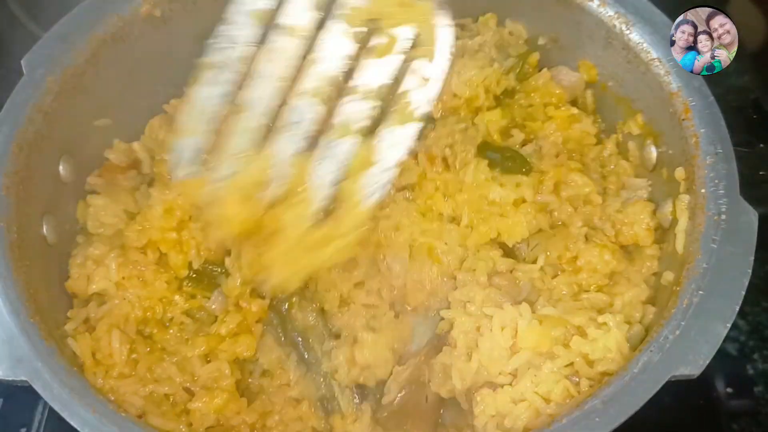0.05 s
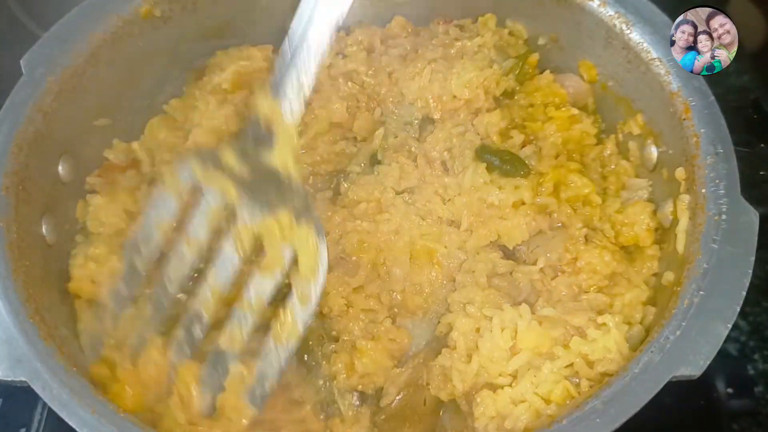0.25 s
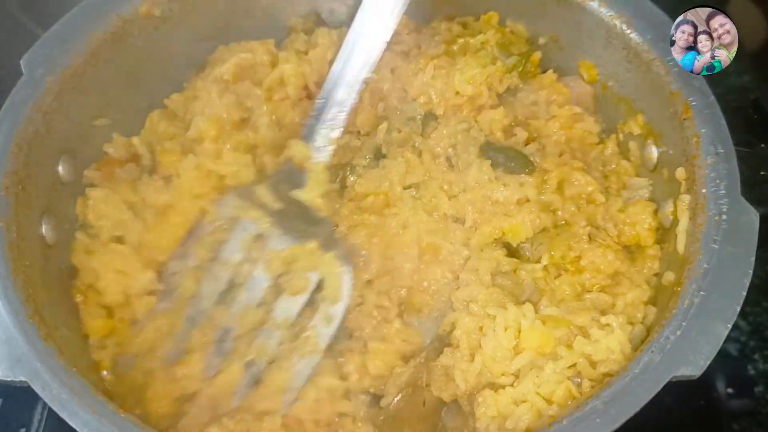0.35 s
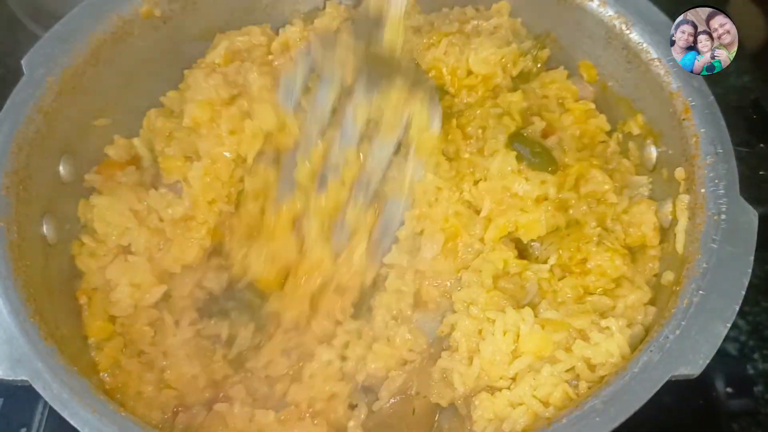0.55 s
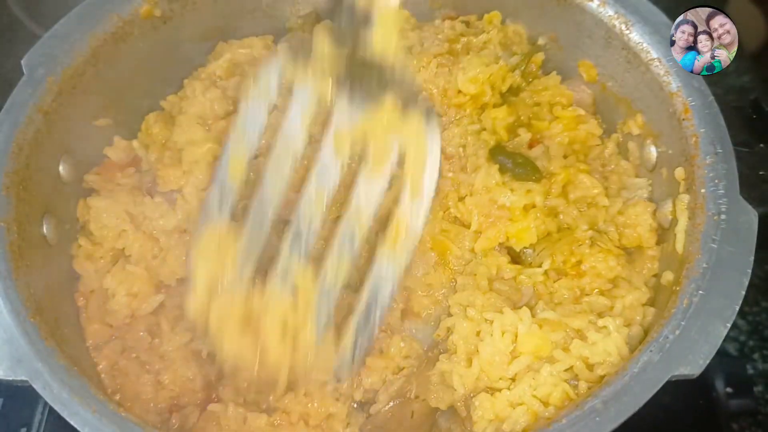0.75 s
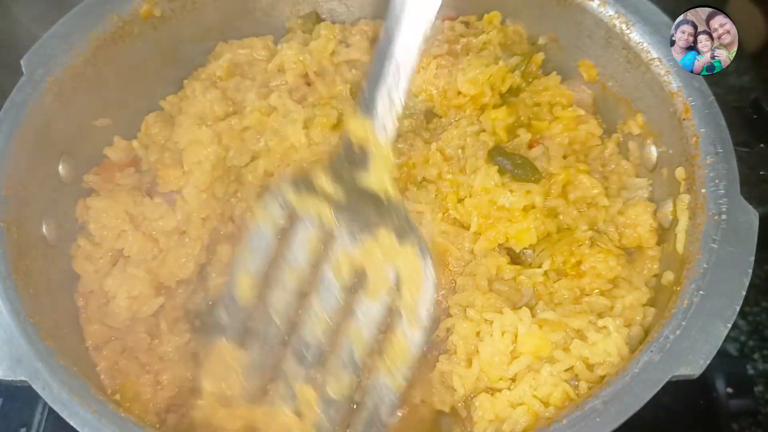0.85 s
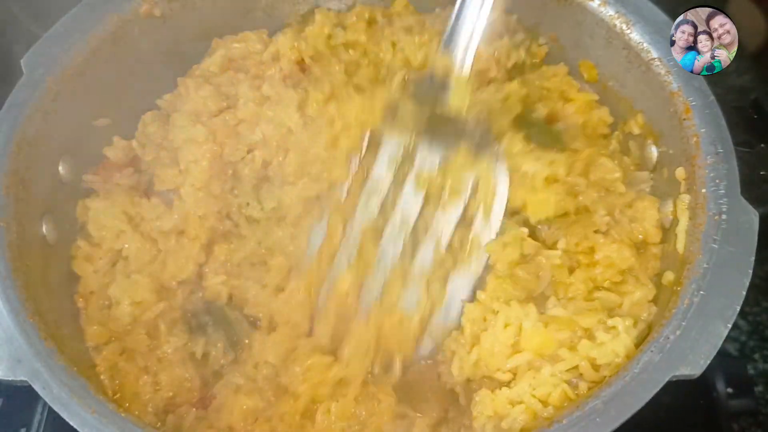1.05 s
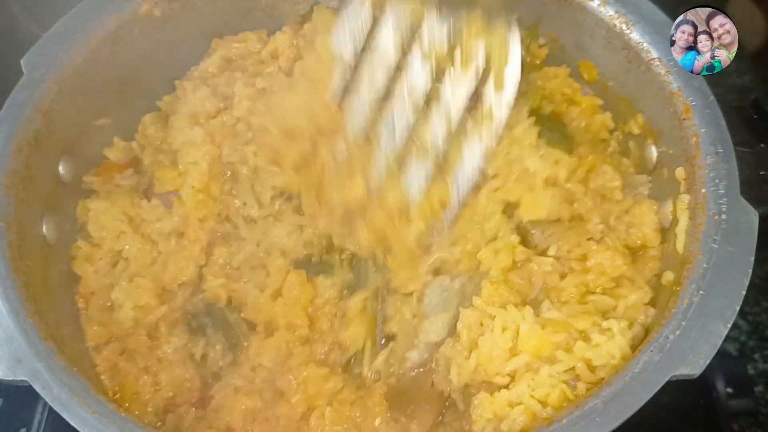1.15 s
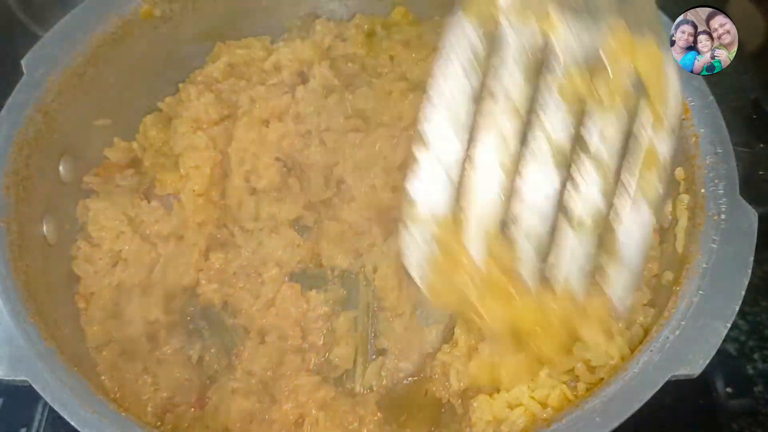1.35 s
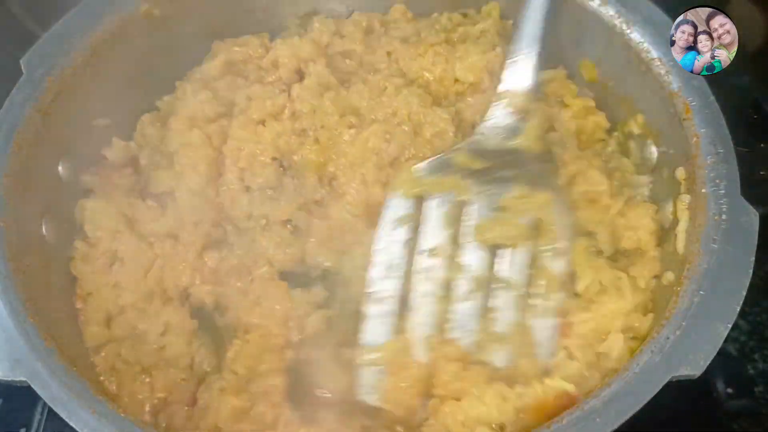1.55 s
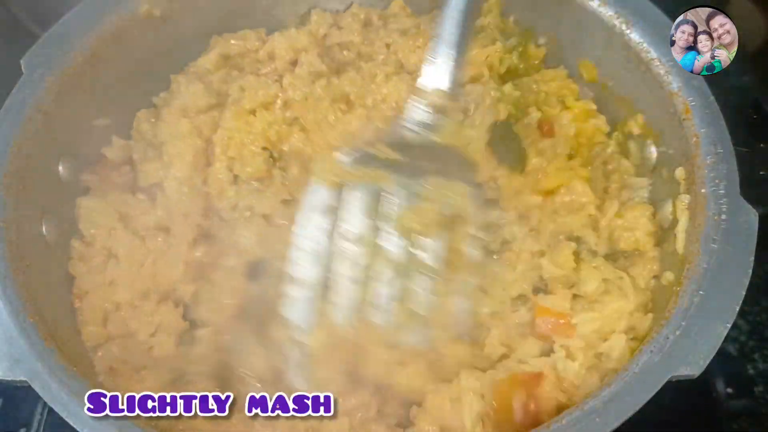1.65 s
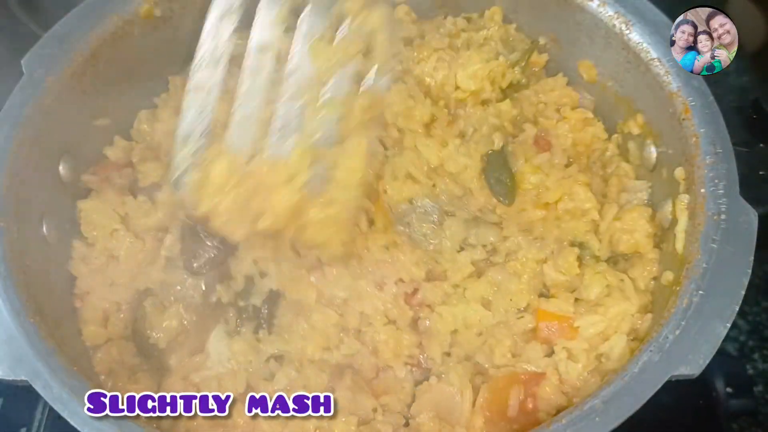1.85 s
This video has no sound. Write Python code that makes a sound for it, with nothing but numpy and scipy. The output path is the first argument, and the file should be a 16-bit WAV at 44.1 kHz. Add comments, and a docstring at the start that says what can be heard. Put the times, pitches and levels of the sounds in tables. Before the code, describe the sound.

A metal spatula works soft cooked rice in an aluminium pot. After near quiet, a hard bright clack at 0.18 seconds rings briefly, with a tiny skid and kitchen echo. Wet, crackly squelches follow around 0.4-0.65, 0.85-1.2 and 1.45-1.9 seconds, with sticky snaps and soft dull bumps. Faint hiss, low motor hum, a thin broken whistle after 1.2 and a quiet steady tone from 1.7 lie underneath.

```python
"""Rice worked in a metal pot

A slotted steel spatula works through soft cooked rice in an aluminium pot. One hard metal clack, a noise
crack with ringing modes, sounds in a bare kitchen; then the rice, made of dense tiny pops and noise,
squelches and crackles with each stroke, with snaps and a few dull bumps. Underneath are filtered room
noise, a low motor hum of sines, a thin whistle of narrow noise and, near the end, a faint steady tone.
"""
import sys
import numpy as np
from scipy import signal
from scipy.fft import rfft, irfft, next_fast_len
from scipy.io import wavfile
from scipy.ndimage import map_coordinates

SR = 44100
rng = np.random.default_rng(int(sys.argv[2]) if len(sys.argv) > 2 else 0)


def wav_record(signal):
    """Record a signal, one row per channel, as 16-bit PCM in the file named by sys.argv[1]."""
    frames = np.transpose(np.atleast_2d(signal))
    bounded = np.clip(frames, -1, 1)
    # unit amplitude maps onto the largest positive 16-bit level
    quanta = np.round(bounded * 32767).astype(np.int16)
    wavfile.write(sys.argv[1], SR, quanta)


N = 83790
TOP_HZ = 15750  # band limit


def amp(db):
    """Decibel law: 20 dB is a tenfold amplitude."""
    return 10 ** (np.asarray(db) / 20)


def unit(x):
    """Normalisation: scale to an rms of 1."""
    return x / np.sqrt(np.mean(x ** 2) + 1e-20)


def along(points, hz):
    """Logarithmic frequency scale: interpolate (Hz, value) points on it."""
    f, v = np.transpose(points)
    return np.interp(np.log(hz + 1), np.log(f + 1), v)


def since(s):
    """Time origin: seconds since s, zero before it."""
    return np.maximum(np.arange(N) / SR - s, 0)


def level(rows):
    """Amplitude envelope: gain from (s, dB) rows, faded in at 110 dB/s ahead of the first."""
    s, db = np.transpose(rows)
    t = since(0)
    fade_in_db = 110 * np.maximum(s[0] - t, 0)
    return amp(np.interp(t, s, db) - fade_in_db)


def wobble(rate):
    """Slow modulation: a smooth random curve with this many knots a second."""
    knots = rng.standard_normal(1024)
    return map_coordinates(knots, [since(0) * rate], mode="wrap")


def filtered(x, response):
    """Linear filtering: multiply the spectrum of x by a response of frequency."""
    size = next_fast_len(N + SR // 2)
    hz = np.fft.rfftfreq(size, 1 / SR)
    return irfft(rfft(x, size) * response(hz), size)[..., :N]


def panned(x, balance):
    """Level difference between the ears: (Hz, left minus right dB) points, half to each side."""
    return filtered(x, lambda hz: amp(along(balance, hz) * np.array([[.5], [-.5]])))


# Likeness of the two channels. Each row: frequency in Hz, left-right correlation.
CHANNEL_LIKENESS = [(60, 0.82), (300, 0.56), (600, 0.35), (1200, -0.063), (2000, -0.033), (4000, -0.053),
                    (5600, 0.0084), (7000, 0.78), (12000, 0.95), (15000, .3)]


def coloured(pair, colour, alike=CHANNEL_LIKENESS):
    """Interchannel coherence: two unrelated signals share out as mid and side, filtered, at rms 1."""
    def mid_and_side(hz):
        turn = np.arccos(np.clip(along(alike, hz), -.98, .98)) / 2
        return amp(along(colour, hz)) * [np.cos(turn), np.sin(turn)]

    mid, side = filtered(pair, mid_and_side)
    return unit(np.array([mid + side, mid - side]))


def noise(colour):
    """Spectral shaping: white noise becomes coloured stereo noise of rms 1."""
    return coloured(rng.standard_normal((2, N)), colour)


def bursts(rows, colour, t60, alike=CHANNEL_LIKENESS):
    """Impact excitation: each (s, dB) row starts a noise burst with exponential decay."""
    shape = 0
    for s, db in rows:
        t = since(s)
        shape = shape + amp(db - 60 * t / t60) * (1 - np.exp(-t / 0.00015))  # attack in s
    return shape * coloured(rng.standard_normal((2, N)), colour, alike)


# Reverberation of the kitchen. Each row: frequency in Hz, time to fall 60 dB in seconds.
KITCHEN_T60 = [(200, 0.71), (530, 0.48), (1400, 0.49), (3700, .42), (9700, .43)]


def dying(x, start):
    """Reverberant decay: from start on, each frequency fades at its own rate."""
    hz, t, z = signal.stft(x, SR, nperseg=256)
    fade = amp(-60 * np.maximum(t - start, 0) / along(KITCHEN_T60, hz)[:, None])
    return signal.istft(z * fade, SR, nperseg=256)[1][:, :N]


GRAINS_PER_S, GRAIN_HZ = 2200, 6820
GRAIN_OCTAVES, GRAIN_CYCLES = 0.692, 2.3  # pitch spread; cycles for a pop to fall to 1/e
GRAIN_SPREAD_DB = 3  # scale of the exponential spread in size


def grains(colour, rate, centre_hz):
    """Granular superposition: dense tiny pops, each a few cycles at its own pitch, of uneven size."""
    count = int(rate * N / SR)
    place, luck, phase, angle = rng.random((4, count, 1))
    hz = centre_hz * 2 ** (GRAIN_OCTAVES * rng.standard_normal((count, 1)))
    hz = np.clip(hz, 100, TOP_HZ)
    k = np.arange(int(16 * SR / centre_hz) + 64)
    size = amp(GRAIN_SPREAD_DB * np.minimum(-np.log(1 - luck), 4))
    cycles = hz * k / SR
    pops = size * np.sin(2 * np.pi * (cycles + phase)) * np.exp(-cycles / GRAIN_CYCLES)
    at = ((place * N).astype(int) + k).ravel()
    # a random angle shares each pop between the two signals
    shares = [np.cos(2 * np.pi * angle), np.sin(2 * np.pi * angle)]
    pair = [np.bincount(at, (pops * share).ravel(), N)[:N] for share in shares]
    return coloured(np.array(pair), colour)


# Even hiss of the room. Each row: frequency in Hz, relative density in dB per Hz.
HISS_COLOUR = [(100, -5), (500, 7), (1200, 0.5), (3000, 2), (5500, -4.5), (7800, -5.5), (11000, -7),
               (15000, -12)]


def room_hiss():
    """Stationary noise: an even hiss with a fixed spectrum."""
    return amp(-73) * noise(HISS_COLOUR)


# Motor partials. Each row: frequency in Hz, level in dB before the low-background envelope.
HUM_PARTIALS = [(70.5, -73), (142, -74.5), (208, -81)]
HUM_WAVER_DB, HUM_DRIFT_RAD = 1.5, 0.67


def motor_hum():
    """Tonal partials: low sines whose level and phase waver slowly."""
    hum = 0
    for hz, db in HUM_PARTIALS:
        strength = amp(db + HUM_WAVER_DB * wobble(3.7))
        hum = hum + strength * np.sin(2 * np.pi * hz * since(0) + HUM_DRIFT_RAD * wobble(9))
    return np.sqrt(2) * hum  # a sine of rms 1 peaks at root 2


# Low room noise. Each row: frequency in Hz, relative density in dB per Hz.
RUMBLE_COLOUR = [(25, 5), (45, -8), (80, 1.5), (150, -1.5), (300, -9), (600, -22), (1500, -39),
                 (4000, -68.5)]
# Shared rise and fall of hum and rumble. Each row: time in seconds, gain in dB.
LOW_GAIN = [(0, 0), (.15, -1.5), (.25, 7.5), (.52, 5.5), (.68, 0.5), (.78, -4), (.87, 0), (1.05, 2),
            (1.3, -1), (1.6, 4), (1.9, 5)]


def low_background():
    """Common modulation: one envelope moves the hum and the low noise together."""
    rumble = amp(-69.5) * noise(RUMBLE_COLOUR)
    return level(LOW_GAIN) * (motor_hum() + rumble)


# Thin broken whistle. Each row: time in seconds, level in dB.
WHISTLE_LEVEL = [(1.19, -83.5), (1.23, -74), (1.31, -75.5), (1.37, -86), (1.47, -73.5), (1.55, -82),
                 (1.68, -72), (1.82, -70), (1.9, -82)]
WHISTLE_HZ, WHISTLE_WIDTH_HZ = 2033, 72


def whistle():
    """Resonant filtering: noise in a narrow band is heard as a breathy pitch."""
    peak = lambda hz: 1 / (1 + ((hz - WHISTLE_HZ) / WHISTLE_WIDTH_HZ) ** 2)
    return level(WHISTLE_LEVEL) * unit(filtered(rng.standard_normal((2, N)), peak))


TONE_START_S, TONE_RISE_S, TONE_HZ, TONE_DB = 1.698, 0.06, 327, -66.5


def held_tone():
    """Phase modulation: a faint held sine wanders by about a radian."""
    rise = np.minimum(since(TONE_START_S) / TONE_RISE_S, 1)
    sine = np.sin(2 * np.pi * TONE_HZ * since(0) + wobble(25))
    return np.sqrt(2) * amp(TONE_DB) * rise * sine


def background():
    """Superposition: hiss, hum with low noise, whistle and tone add."""
    return room_hiss() + low_background() + whistle() + held_tone()


# Blade bumping the pot through the rice. Each row: start in seconds, relative level in dB.
BUMP_TIMES = [(0.480, -43), (0.507, -48), (1.156, -48), (1.3485, -55.5), (1.657, -54.5), (1.739, -53.5),
              (1.870, -53.5)]
# Dull colour of a bump. Each row: frequency in Hz, relative density in dB per Hz.
BUMP_SPECTRUM = [(150, 4.5), (450, 4), (950, 6), (1500, -1.5), (2700, 4.5), (4500, -18), (10000, -51)]


def bumps():
    """Damped impact: the rice leaves short, dull knocks."""
    return amp(-3) * bursts(BUMP_TIMES, BUMP_SPECTRUM, 0.031)


# Low mush of the rice. Each row: time in seconds, relative level in dB.
MUSH_LEVEL = [(0.44, -64), (0.496, -61.5), (0.582, -71.5), (0.61, -66.5), (0.814, -90), (0.85, -76),
              (1.066, -70), (1.138, -76.5), (1.154, -72), (1.326, -93), (1.346, -71), (1.472, -79.5),
              (1.586, -67), (1.9, -64.5)]
# Filter on the low pops. Each row: frequency in Hz, relative gain in dB.
MUSH_FILTER = [(150, -21), (330, 5), (550, -1.5), (1000, -4.5), (1700, 0.5), (2600, -5), (5000, -24.5)]


def mush():
    """Granular superposition: sparser, lower pops make the soft body of the rice."""
    return level(MUSH_LEVEL) * amp(-2) * grains(MUSH_FILTER, 700, 907)


# Wet fizz, also the splash of a snap. Each row: frequency in Hz, relative density in dB per Hz.
FIZZ_COLOUR = [(500, -24.5), (1500, -14), (2200, -6), (3100, -1.5), (4000, -5.5), (6000, -11.5),
               (7700, -4.5), (9500, -11), (12000, -16.5), (15000, -8.5)]
# Sticky pockets of air snapping open. Each row: start in seconds, relative level in dB, pitch in Hz.
AIR_POCKETS = [(0.554, -41, 8000), (0.606, -39.5, 5980), (0.614, -35.5, 7400), (0.899, -48.5, 13000),
               (0.913, -45.5, 7660), (0.9432, -42.5, 7650), (1.011, -43.5, 13300), (1.033, -45.5, 4740),
               (1.045, -46.5, 7800), (1.123, -43.5, 8150), (1.173, -41.5, 7500), (1.391, -44.5, 5200),
               (1.522, -44.5, 7870), (1.536, -44, 3110), (1.568, -35, 7900), (1.62, -44, 3000),
               (1.634, -51, 7300), (1.661, -46, 6440), (1.7777, -39.5, 7140), (1.8, -48, 10000),
               (1.822, -33, 7230), (1.838, -41, 8700), (1.87, -41, 3850)]
SNAP_DB, SNAP_SPLASH_DB = -3.5, -6.5  # the splash is relative to the note
SNAP_T60_S, SNAP_WIDTH_HZ = 0.011, 1800


def snaps():
    """Damped oscillation: each air pocket gives a short rough note and a little broad splash."""
    notes = 0
    for s, db, hz in AIR_POCKETS:
        t = since(s)
        decay = amp(db - 60 * t / SNAP_T60_S) * (t > 0)
        # fast random phase roughens the note
        notes = notes + decay * np.sin(2 * np.pi * hz * t + wobble(2 * SNAP_WIDTH_HZ))
    splash = bursts([row[:2] for row in AIR_POCKETS], FIZZ_COLOUR, SNAP_T60_S)
    return amp(SNAP_DB) * (notes + amp(SNAP_SPLASH_DB) * splash)


# How hard the rice is worked. Each row: time in seconds, relative level of the squelch in dB.
STROKE_LEVEL = [(.42, -56.5), (.53, -54), (.58, -62.5), (.625, -56.5), (.69, -74.5), (.81, -101),
                (.85, -64), (.9, -69.5), (.99, -65.5), (1.045, -56), (1.1, -62.5), (1.16, -53),
                (1.24, -76.5), (1.36, -78), (1.48, -64), (1.59, -54.5), (1.71, -59.5), (1.835, -51.5),
                (1.9, -56)]
# Filter on the crackling pops. Each row: frequency in Hz, relative gain in dB.
CRACKLE_FILTER = [(500, -27.5), (1500, -15), (3100, -6), (5500, -4.5), (7700, 0.5), (9500, -3.5),
                  (12000, -3), (15000, 3)]
CRACKLE_DB, FIZZ_DB = -2.5, -5
CLUMP_DB, CLUMPS_PER_S = 3, 110  # random level swing of the crackle, knots a second


def squelch():
    """Amplitude modulation: the strokes drive clumped crackle and wet fizz together."""
    clumps = amp(CLUMP_DB * wobble(CLUMPS_PER_S))
    crackle = unit(clumps * grains(CRACKLE_FILTER, GRAINS_PER_S, GRAIN_HZ))
    fizz = noise(FIZZ_COLOUR)
    return level(STROKE_LEVEL) * (amp(CRACKLE_DB) * crackle + amp(FIZZ_DB) * fizz)


def rice():
    """Convolution reverberation: wet grains part and stick under the blade, in the room."""
    direct = squelch() + mush() + snaps() + bumps()
    tail = dying(rng.standard_normal((2, N)), 0)
    tail = tail / np.linalg.norm(tail[0])
    return direct + amp(-7) * signal.fftconvolve(direct, tail, axes=1)[:, :N]


# The clack and its quick rebound. Each row: start in seconds, level in dB.
CLACK_HITS = [(0.1837, -14.5), (0.1873, -25.5)]
# Colour of the contact. Each row: frequency in Hz, relative density in dB per Hz.
CONTACT_COLOUR = [(100, -25), (220, -11), (380, -5), (600, -5.5), (900, -5), (1500, -0.5), (2000, 0.5),
                  (2400, -8.5), (3300, 3.5), (5300, -3), (8400, 4), (9300, -3.5), (11500, -13),
                  (15000, -18.5)]
# Direct sound, partly out of phase. Each row: frequency in Hz, left-right correlation,
# left minus right in dB.
CONTACT_STEREO = [(400, 0.87, -1.5), (749, 0.48, -3.5), (1220, -0.12, 3.5), (1900, -.85, 3),
                  (2870, 0.17, 13), (3670, -0.14, -2.5), (4600, -0.042, 5.5), (7000, 0.2, -2),
                  (8560, 0.35, 3), (11000, .6, 1), (13400, -0.22, -8.5)]
CLACK_START_S = CLACK_HITS[0][0]


def crack():
    """Impact excitation: metal meets metal in a broadband burst, then rebounds."""
    alike = [(hz, likeness) for hz, likeness, pan in CONTACT_STEREO]
    balance = [(hz, pan) for hz, likeness, pan in CONTACT_STEREO]
    return panned(bursts(CLACK_HITS, CONTACT_COLOUR, 0.021, alike), balance)


# Modes of the struck metal. Each row: frequency in Hz, relative level in dB,
# time to fall 60 dB in seconds.
METAL_MODES = [(2038, -2.5, 0.31), (2532, -3, 0.41), (3140, -5, .35), (4396, -15.5, 0.27),
               (4512, 1.5, 0.34), (4620, -7.5, 0.21), (4710, -11.5, 0.24), (5200, -6, 0.38),
               (6169, -1, 0.33), (7010, 1, 0.13), (7180, -2, 0.38), (7770, -4, 0.39), (7790, 3, 0.37),
               (8070, -2, .34), (8570, -9.5, .32)]
RING_DB, RING_ATTACK_S = -34.5, 0.016


def ring():
    """Modal vibration: the struck metal sounds as a sum of decaying sines."""
    t = since(CLACK_START_S)
    modes = np.zeros((2, N))
    for hz, db, t60 in METAL_MODES:
        # a phase difference between the channels sets their likeness
        likeness = np.clip(along(CHANNEL_LIKENESS, hz), -1, 1)
        apart = np.arccos(likeness) * np.array([[.5], [-.5]])
        blur = .4 * wobble(40)  # radians
        phase = 2 * np.pi * (hz * t + rng.random()) + blur + apart
        modes += amp(RING_DB + db - 60 * t / t60) * np.sin(phase)
    return modes * (1 - np.exp(-t / RING_ATTACK_S))


# The kitchen's answer, also the filter on the skid. Each row: frequency in Hz, relative level in dB
# (per Hz for the echo).
ANSWER_COLOUR = [(100, -24.5), (200, -12.5), (340, -3.5), (500, -7), (800, -4.5), (1250, -4.5), (1550, -8),
                 (1950, 2), (2400, -1.5), (3100, 2.5), (4000, -3), (4700, -1), (5600, -6), (7400, -0.5),
                 (8600, -0.5), (9200, -11), (12000, -13.5), (15000, -12)]
SKID_S, SKID_DB, SKID_WIDTH_S = 0.2335, -33.5, .011  # width: centre to 1/e


def skid():
    """Friction as granular superposition: the blade skids on briefly in a swell of pops."""
    swell = np.exp(-((since(0) - SKID_S) / SKID_WIDTH_S) ** 2)
    return amp(SKID_DB) * swell * grains(ANSWER_COLOUR, GRAINS_PER_S, GRAIN_HZ)


ECHO_DB, ECHO_HOLD_S, ECHO_RISE_S = -29.5, 0.035, 0.00067


def echo():
    """Diffuse reverberation: wall reflections, as noise, hold briefly and then die."""
    rise = 1 - np.exp(-since(CLACK_START_S) / ECHO_RISE_S)
    return amp(ECHO_DB) * rise * dying(noise(ANSWER_COLOUR), CLACK_START_S + ECHO_HOLD_S)


def clack():
    """Superposition: contact, skid, ringing metal and reflections add."""
    return crack() + skid() + ring() + echo()


def scene():
    """Superposition: the kitchen, the rice and the struck pot together."""
    return background() + rice() + clack()


# Colour difference of the microphones. Each row: frequency in Hz, left minus right in dB.
MICROPHONE_BALANCE = [(100, -0.5), (400, -0.5), (2000, -0.5), (4000, -.5), (7000, -3), (9000, -2),
                      (12000, -0.5), (14000, -6.5)]


def record(dry):
    """Band limiting: two microphones differ a little in colour and keep nothing above the limit."""
    return filtered(panned(dry, MICROPHONE_BALANCE), lambda hz: hz < TOP_HZ)


dry = scene()
out = record(dry)
wav_record(out)
```